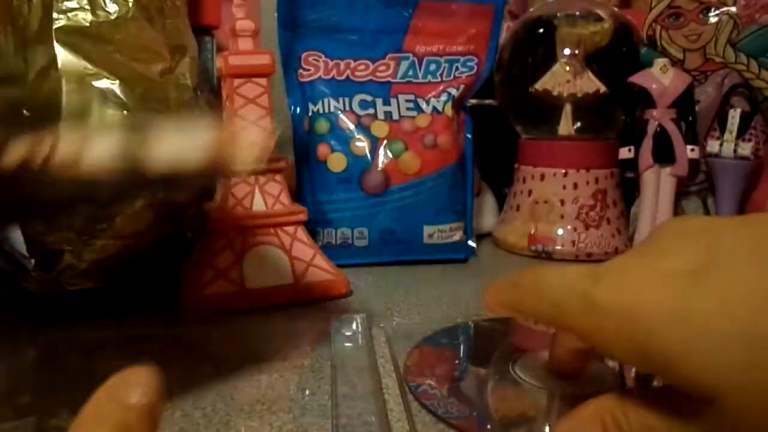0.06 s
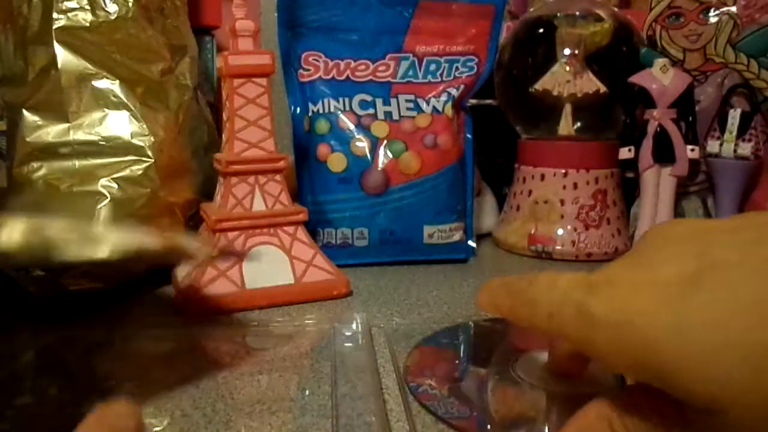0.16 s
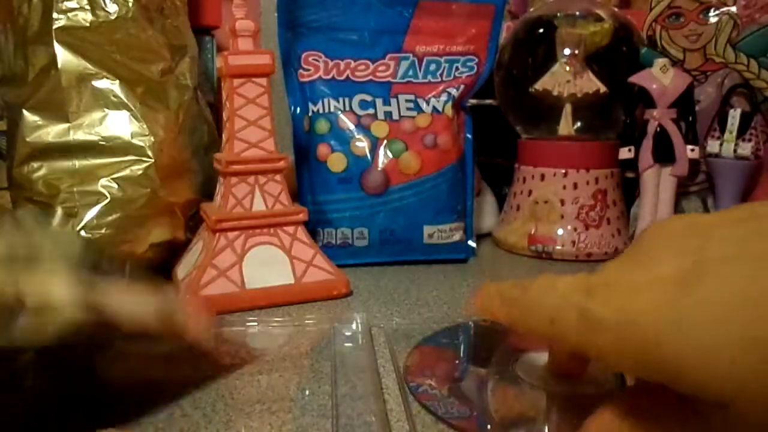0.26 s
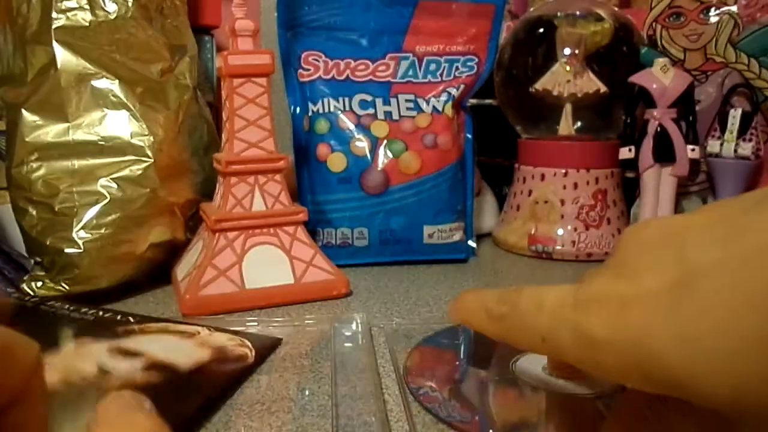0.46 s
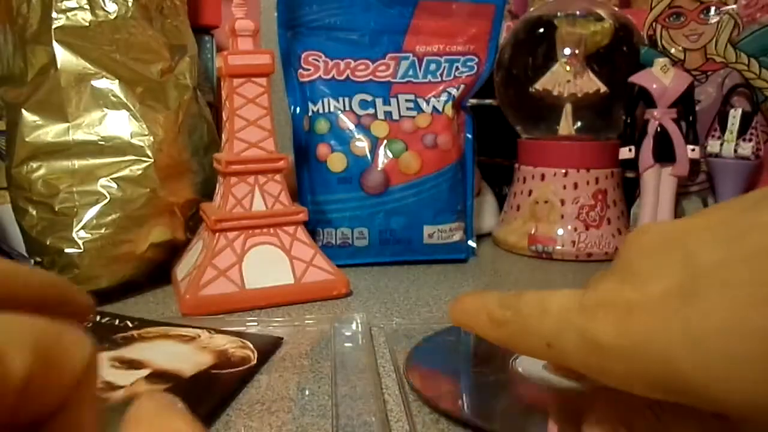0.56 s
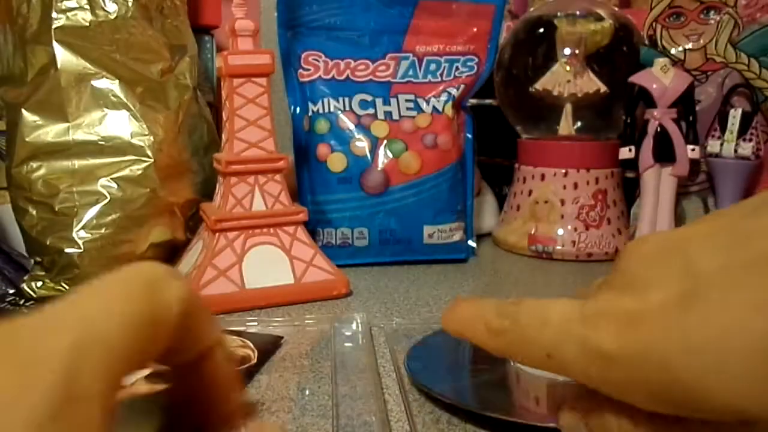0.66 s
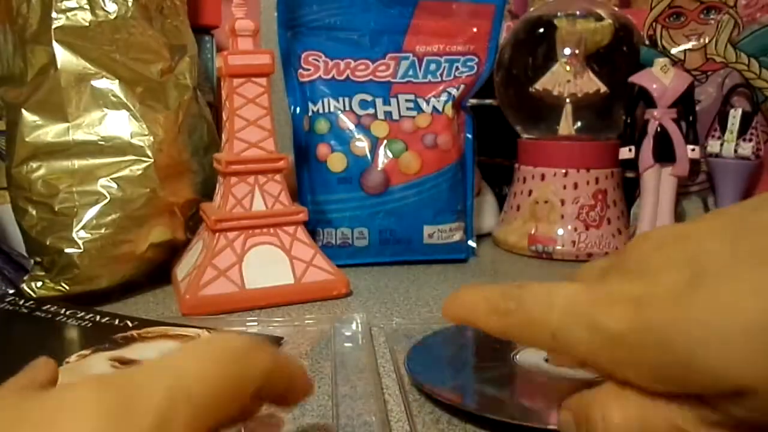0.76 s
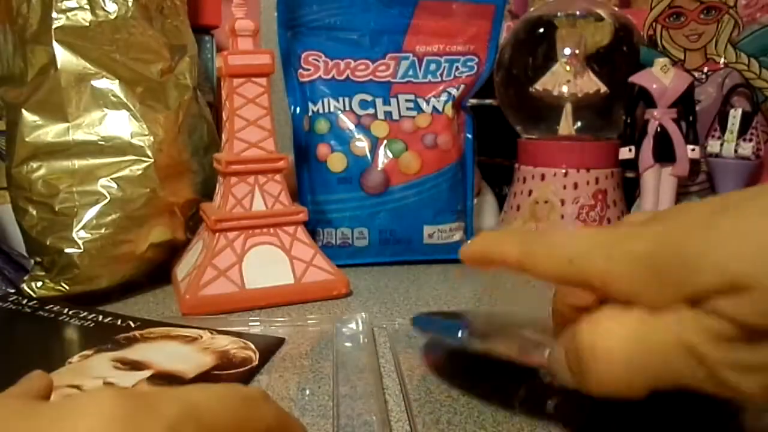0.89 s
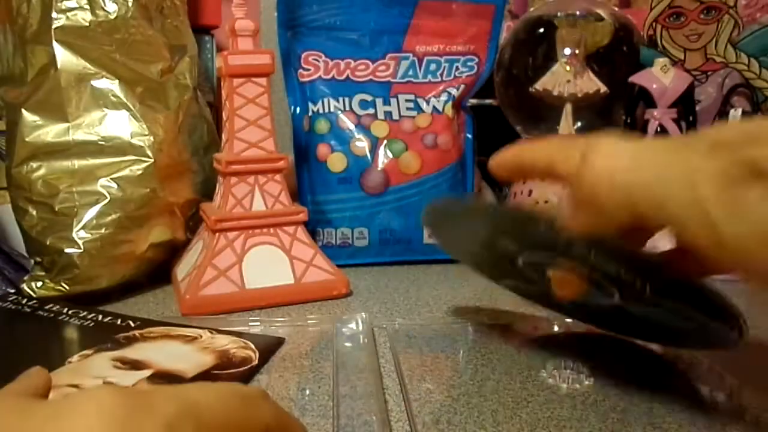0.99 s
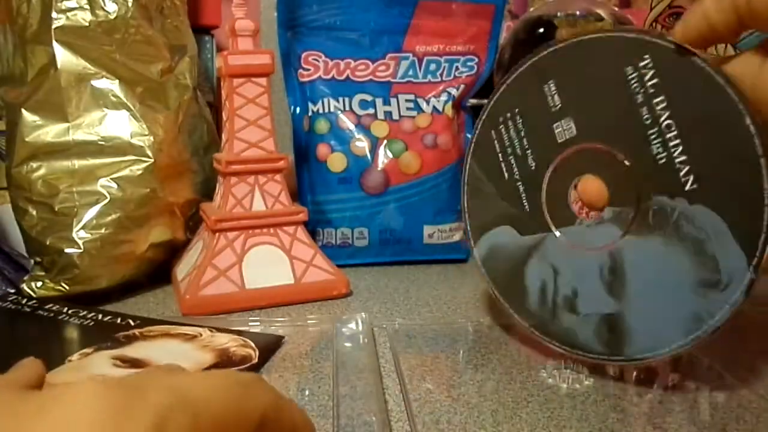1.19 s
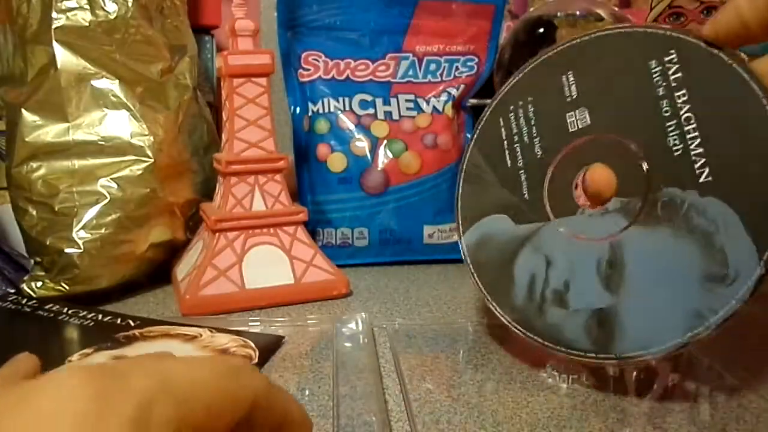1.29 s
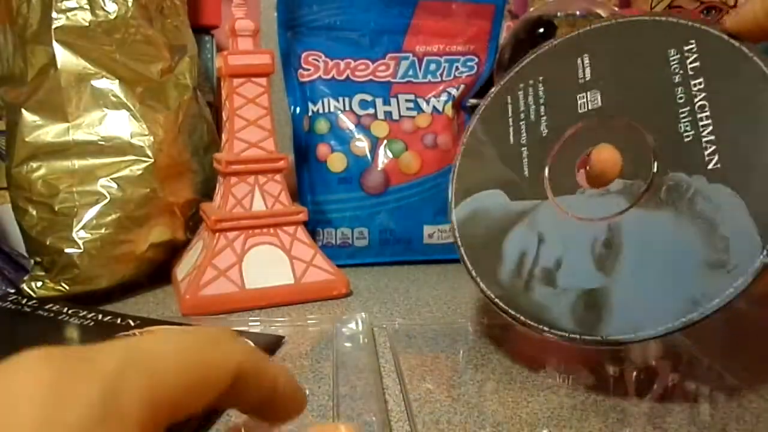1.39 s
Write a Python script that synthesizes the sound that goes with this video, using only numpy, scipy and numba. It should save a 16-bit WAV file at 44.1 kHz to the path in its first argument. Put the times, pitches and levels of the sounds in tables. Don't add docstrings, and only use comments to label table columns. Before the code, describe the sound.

Two sharp plastic snaps of a disc case, heard close in a small room with a low fan drone. Faint paper brushing and ticks come first, from 0.1 s. A loud, rattling crack hits at 0.35 s, then a jolt of rustle, squeak and clicks around 0.41-0.48 s. A brighter, shorter snap follows at 0.49 s. Small ticks, rubs and faint squeaks continue until 0.86 s, then mostly fan, dipping after the snaps and slowly recovering.

```python
import sys
import numpy as np
from scipy import signal
from scipy.fft import rfft, irfft
from scipy.io import wavfile
from scipy.ndimage import uniform_filter1d
from numba import njit

SR = 44100
rng = np.random.default_rng(int(sys.argv[2]) if len(sys.argv) > 2 else 0)


def put_to_file(sound):
    columns = np.atleast_2d(sound).T
    safe = np.clip(columns, -1, 1)
    whole_steps = np.round(safe * 32767)
    wavfile.write(sys.argv[1], SR, whole_steps.astype(np.int16))


def nominal_scale(level):
    x = np.asarray(level, float) / 20
    return 10 ** x


N = 63945
T = np.arange(N) / SR

# [Hz, dB per Hz]
FAN_AIR = [(12, -43), (20, -14), (96, -12), (134, -5), (459, -16.5), (780, -15.5), (1660, -23.5),
           (2460, -26), (16000, -50)]
# [Hz, Hz, dB]
FAN_RESONANCES = [(57.7, 23, -47.5), (134.7, 16.5, -45.5), (209.4, 19, -48), (263.6, 21.3, -56),
                  (334, 65, -55), (428.2, 20, -56.5), (636, 37.5, -53), (765, 139, -47), (2463, 66, -56.5)]
# [Hz, dB per Hz]
PAPER_SPECTRUM = [(500, 4.5), (1500, 4.5), (4000, 2), (9000, -1.5), (15500, -1)]
# [s, dB]
RUSTLE_LEVEL = [
    (0.0, -60),
    (0.18, -57.5),
    (0.35, -46),
    (0.416, -29),
    (0.456, -56),
    (0.548, -61),
    (0.592, -58),
    (0.818, -53),
    (1.0, -54),
    (1.45, -56.5),
]
# [s, s, dB, 0-1]
SLIDES = [
    (0.115, .025, -57, 1),
    (0.204, 0.095, -58, 1),
    (0.34, 0.0045, -44, 0.4),
    (0.542, .032, -44, 1),
    (0.776, 0.015, -49.5, .9),
    (0.793, 0.019, -49, 0.5),
    (0.827, 0.024, -51.5, .8),
    (0.978, 0.013, -68, .9),
    (1.04, 0.036, -68, .9),
]
# [s, Hz, Hz per s, dB, s]
DISC_CHIRP = (.4075, 3300, -85000, -31, .008)
# [s, Hz, Hz per s, dB, s]
SQUEAKS = [
    (0.432, 6470, 1, -34, .009),
    (.618, 4500, 0, -50, .011),
    (0.796, 1660, 0.0051, -40, .008),
    (0.803, 1590, 0, -42.5, 0.011),
    (.843, 5550, 0.01, -47, 0.019),
]
TICK_TIMES = (.114, .2069, .2071, .2378, .2693, .3045, .367, .4085, .4325, .4605, .4605, .4772, .510, .5775,
              .622, .8135, .796, .861)
# [dB, Hz, dB, s, dB]
TICKS = [(-41.5, 5000, -70, 0.17, -50), (-37, 1380, -36.5, 0.032, -28.5), (-50, 13800, -24.5, .012, -14.5),
         (-36.5, 15000, -38, 0.039, -32), (-39, 5600, -55, .04, -50), (-36.5, 7500, -42, 0.034, -46),
         (-30, 3900, -38, 0.083, -30), (-28, 21000, -46, 0.036, -50), (-28.5, 7900, -53, 0.067, -40),
         (-19, 7700, -20, 0.014, -19), (-27.5, 1640, -31.5, 0.053, -27), (-25, 7500, -25, 0.18, -34),
         (-28, 1930, -38, 0.099, -40), (-31, 7500, -36, 0.021, -25), (-40, 12000, -47, .02, -50),
         (-50, 1400, -39, 0.032, -25), (-45, 9300, -46, 0.044, -58), (-75, 630, -56, 0.016, -49)]
SNAP_TIMES = [
    .3497,
    .4904,
]
# [dB, Hz]
SNAP_BLOWS = [
    (-1.5, 2500),
    (-6, 5000),
]
# [dB, dB, s]
SNAP_LEVELS = [
    (-14, -16, 0.11),
    (-10.5, -8, 0.044),
]
# [Hz, dB, s]
CASE_MODES = [(705, -10, 0.083), (1090, 0, 0.02), (1560, -0.5, 0.058), (2040, -18, 0.024), (2340, -3, .03),
              (2530, -15, 0.025), (3156, 3, 0.041), (3564, -5.5, 0.11), (3940, -4, 0.041),
              (5090, -8, 0.043), (6100, -4.5, .03), (7520, 8.5, 0.013), (7560, -6, 0.028),
              (12140, -6, 0.032)]
HUB_MODES = [(1142, -13, .07), (1588, -12, 0.076), (1747, -10, 0.067), (2190, -19, 0.05), (4133, -4, 0.029),
             (4240, -8, 0.048), (6130, -19, 0.039), (7800, -5.5, 0.041), (9270, 4, 0.0077),
             (11600, -21, .02), (13440, -14, .02), (13120, 1, 0.028), (14020, 8.5, 0.0067)]
# [Hz, dB per Hz]
CASE_RATTLE = [(400, -18), (750, -4.5), (1500, -2), (3200, -4), (4700, -7.5), (7500, -3), (12500, -22),
               (16000, -12.5)]
HUB_RATTLE = [(500, -39), (950, -41), (1150, -5.5), (2400, -4), (5000, 0.5), (8500, -7.5), (13500, 0),
              (16000, -13)]


def unit(x):
    return x / np.sqrt(np.mean(x ** 2))


def colour(x, points):
    hz, db = np.array(points).T
    f = np.fft.rfftfreq(len(x), 1 / SR) + 1
    gain = nominal_scale(np.interp(np.log(f), np.log(hz), db))
    return unit(irfft(rfft(x) * gain, len(x)))


def band(x, hz, width):
    return signal.lfilter(*signal.iirpeak(min(hz, 19000), max(hz / width, 0.5), fs=SR), x)


def highpass(x, order, hz):
    return signal.sosfilt(signal.butter(order, hz, "high", fs=SR, output="sos"), x)


def fall(start, t60, attack=0.0002):
    t = np.maximum(T - start, 0)
    return (1 - np.exp(-t / attack)) * nominal_scale(-60 * t / t60)


def walk(rate):
    k = int(SR / rate)
    steps = np.repeat(rng.standard_normal(N // k + 1), k)
    return 1.48 * uniform_filter1d(uniform_filter1d(steps, k), k)[:N]


def crackle(spread_db):
    strength = np.minimum(rng.exponential(size=N // 16 + 1), 4)
    return rng.standard_normal(N) * nominal_scale(spread_db * np.repeat(strength, 16)[:N])


def click(start, hz):
    t = np.maximum(T - start, 0)
    return -np.sin(2 * np.pi * hz * t) * np.exp(-(t * hz) ** 2)


@njit
def follow(x, up, down, start):
    e, out = start, np.empty(len(x))
    for i in range(len(x)):
        e += (x[i] - e) * (up if x[i] > e else down)
        out[i] = e
    return out


def fan():
    out = nominal_scale(-44) * colour(rng.standard_normal(N), FAN_AIR)
    for hz, width, db in FAN_RESONANCES:
        tone = band(band(rng.standard_normal(N), hz, width), hz, 2 * width)
        out = out + nominal_scale(db + 1.22 * walk(6)) * unit(tone)
    return out


def room(source):
    dull_hz, t60 = 6050, 0.28
    noise = band(rng.standard_normal(N), dull_hz, 2 * dull_hz)
    tail = (noise * fall(0.0016, t60, 0.0033))[:SR // 2]
    return signal.fftconvolve(source, tail / np.sqrt(np.sum(tail ** 2)))[:N]


def rustle():
    grain = nominal_scale(1.36 * walk(60.37)) * colour(crackle(1.0), PAPER_SPECTRUM)
    dull = unit(band(grain, 4500, 9000))
    times, levels = np.array(RUSTLE_LEVEL).T
    out = nominal_scale(np.interp(T, times, levels) - 2.5) * grain
    for start, length, db, bright in SLIDES:
        rise = (T - start) / 0.008
        release = (start + length - T) / 0.021 + 1
        env = np.clip(np.minimum(rise, release), 0, 1)
        out = out + nominal_scale(db) * env * (bright * grain + (1 - bright) * dull)
    return out


def squeaks():
    out, rough = 0, nominal_scale(2.2 * walk(1200))
    drift = np.cumsum(0.05 * walk(1500)) / SR
    for start, hz, glide, db, length in [DISC_CHIRP, *SQUEAKS]:
        t = np.clip(T - start, 0, length)
        cycles = hz * (t + drift) + glide * t * t / 2
        out = out + nominal_scale(db) * rough * np.sin(np.pi * t / length) * np.sin(2 * np.pi * cycles)
    return out


def ticks():
    broad, white = colour(crackle(1.0), PAPER_SPECTRUM), rng.standard_normal(N)
    out = 0
    for start, (db, hz, ring_db, t60, click_db) in zip(TICK_TIMES, TICKS):
        ring = unit(band(white, hz, 0.1 * hz))
        out = out + nominal_scale(click_db) * click(start, hz)
        out = out + fall(start, t60) * (nominal_scale(db) * broad + nominal_scale(ring_db) * ring)
    return highpass(out, 2, 1230)


def snap(start, blow, levels, modes, rattle_spectrum):
    blow_db, blow_hz = blow
    ring_db, rattle_db, rattle_t60 = levels
    t = np.maximum(T - start, 0)
    ring = 0
    for k, (hz, db, t60) in enumerate(modes):
        drift = np.cumsum(0.03 * walk(1500) * (t > 0)) / SR
        ring = ring + (-1) ** k * nominal_scale(db - 60 * t / t60) * np.sin(2 * np.pi * hz * (t + drift))
    crack = nominal_scale(blow_db) * (click(start, blow_hz) + nominal_scale(-17) * click(start, 3 * blow_hz))
    rattle = fall(start + 0.0002, rattle_t60, 0.00023) * colour(rng.standard_normal(N), rattle_spectrum)
    return np.array([nominal_scale(ring_db) * ring, crack + nominal_scale(rattle_db) * rattle])


def scene():
    case = snap(SNAP_TIMES[0], SNAP_BLOWS[0], SNAP_LEVELS[0], CASE_MODES, CASE_RATTLE)
    hub = snap(SNAP_TIMES[1], SNAP_BLOWS[1], SNAP_LEVELS[1], HUB_MODES, HUB_RATTLE)
    ring, hits = case + hub
    ring = ring + squeaks()
    hits = hits + ticks()
    wet = room(hits + nominal_scale(-9) * ring)
    near = highpass(ring + hits + nominal_scale(-16) * wet, 4, 556)
    return (near + rustle() + fan())[None]


def band_limit(x):
    return signal.sosfilt(signal.butter(12, 16800, fs=SR, output="sos"), x)


def record(dry):
    attack_s, release_s, ratio = 0.06, 0.38, 2.025
    top = float(nominal_scale(-37))
    level = follow(np.abs(dry[0]), 1 / (attack_s * SR), 1 / (release_s * SR), top)
    ducked = dry * np.minimum(top / level, 1) ** (1 - 1 / ratio)
    mix = signal.sosfilt(signal.ellip(8, 0.3, 45, 15750, fs=SR, output="sos"), ducked)
    return band_limit(mix)


dry = scene()
out = record(dry)
put_to_file(out)
```